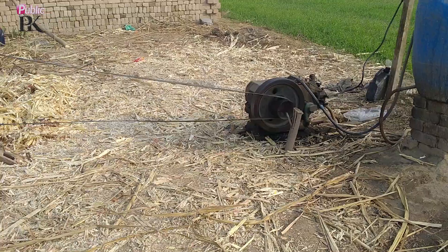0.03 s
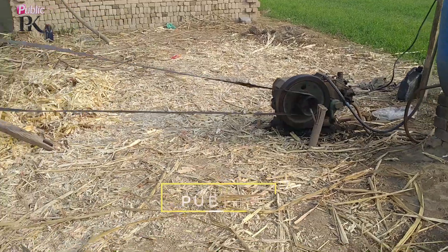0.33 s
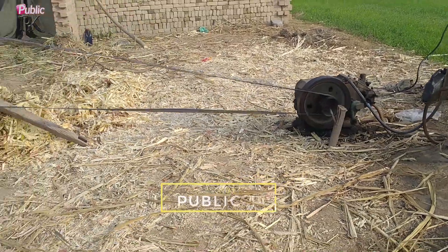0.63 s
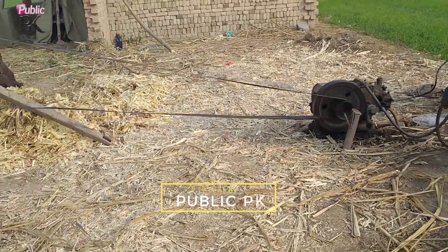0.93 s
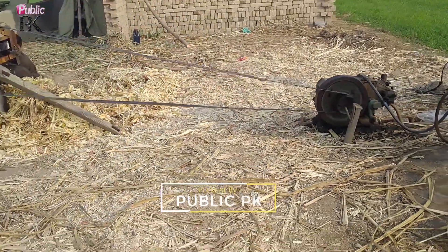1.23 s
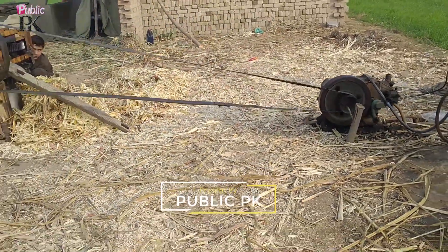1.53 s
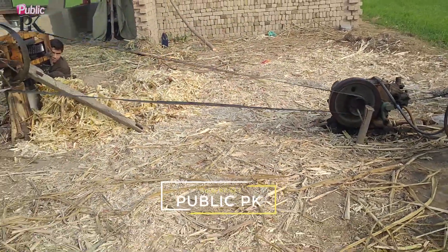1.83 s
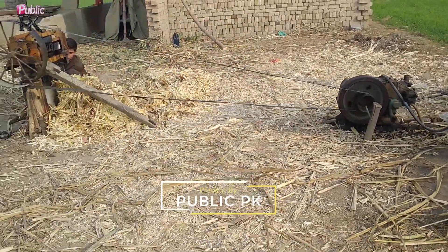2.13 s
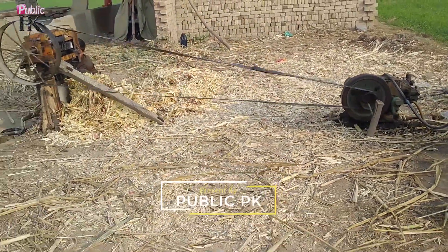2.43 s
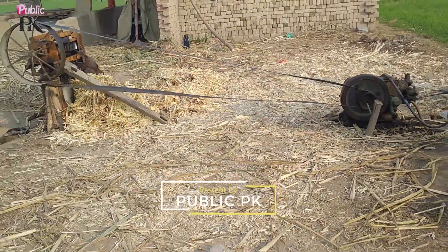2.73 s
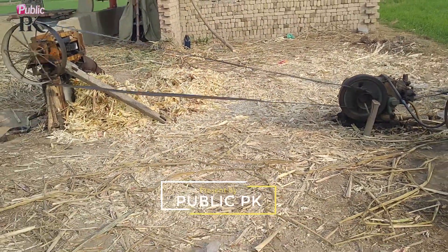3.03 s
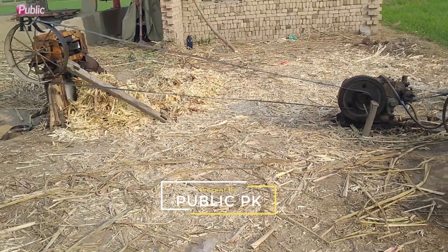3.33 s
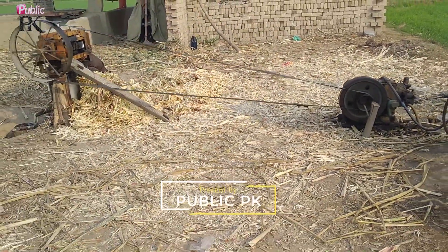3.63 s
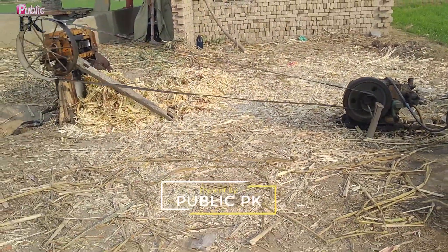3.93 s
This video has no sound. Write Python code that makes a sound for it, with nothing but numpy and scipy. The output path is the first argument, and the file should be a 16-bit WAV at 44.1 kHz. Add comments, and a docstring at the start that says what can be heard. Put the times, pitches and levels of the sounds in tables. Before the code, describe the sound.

A single-cylinder diesel engine chugs fast and steadily in a farmyard, knocking and ticking near the microphone. It drives a cane crusher by a long belt, whose metal fastener clacks and clinks in turn over a low whirr.

```python
"""Farmyard diesel and cane crusher

One microphone in a farmyard, near a single-cylinder diesel firing eleven times a second. Each cycle
brings a thud with its knock, an exhaust bark, an intake gulp and the ticks of the valve gear.
A long flat belt drives the crusher; its metal fastener clacks over each of two pulleys once a lap
and echoes off walls and sheds farther out. Belt and gears whirr and hiss underneath."""
import sys
import numpy as np
from scipy import signal
from scipy.fft import rfft, irfft
from scipy.io import wavfile

SR = 44100
rng = np.random.default_rng(int(sys.argv[2]) if len(sys.argv) > 2 else 0)


def persist_wave(psi):
    """Save psi, clipped to +-1, as 16-bit WAV."""
    counts = np.round(np.clip(psi, -1, 1) * 32767).astype(np.int16)
    wavfile.write(sys.argv[1], SR, np.atleast_2d(counts).T)


N = 176400
TIME = np.arange(N) / SR

# engine speed: time_s, firings_per_s
ENGINE_SPEED = [(0, 11.03), (1.3, 11.02), (1.75, 10.966), (2.3, 10.962), (3.1, 10.99), (3.5, 11.045),
                (4, 11.07)]
# what each pulse of the cycle sets ringing: pitch_hz, level_db, t60_s
PUMP_MODES = [(273, -23.5, 0.041)]
FIRING_MODES = [(131, -18.5, 0.18), (297, -14.5, 0.011), (580, -18.5, 0.02), (760, -16.5, 0.0098),
                (1110, -20, 0.025)]
ROCK_MODES = [(254, -16, 0.042), (88, -25, 0.1)]
EXHAUST_MODES = [(163.2, -20, 0.24), (255, -15.5, 0.042), (523, -22.5, 0.049), (800, -23.5, 0.026),
                 (1119, -18, 0.031)]
INTAKE_MODES = [(233, -19, 0.07), (293, -16.5, 0.14), (875, -30, 0.047)]
# turbulent gas behind the exhaust pulse: frequency_hz, density_db
PUFF_SPECTRUM = [(100, -66), (300, -58.5), (550, -55.5), (950, -61.5), (1120, -52), (1350, -65.5),
                 (2500, -60.5), (5000, -78), (15000, -92)]
# loudness of the engine's whole low voice: time_s, gain_db
CHUG_GAIN = [(.2, 1.5), (.8, 1), (1.6, 0), (2.4, 0.5), (3.2, -0.15), (4, -0.7)]
# intake and exhaust as the microphone moves: time_s, gain_db
INTAKE_GAIN = [(.2, 1.5), (.9, 2), (1.8, 0.5), (3, -.5), (4, -2)]
EXHAUST_GAIN = [(.2, -0.35), (.9, -0.83), (1.8, 0.017), (2.8, -1.2), (4, -0.06)]

# combustion knock in the block: frequency_hz, density_db
KNOCK_SPECTRUM = [(50, -84), (200, -68), (500, -51.5), (1200, -67), (1450, -57), (1750, -51.5), (2020, -62),
                  (2300, -48), (3100, -57.5), (3650, -51.5), (4200, -67), (5300, -71), (6550, -59.5),
                  (7200, -63), (7700, -53.5), (8300, -76), (11000, -101)]
# hardness of the combustion: time_s, gain_db
KNOCK_GAIN = [(.2, -1), (1, -0.5), (2, 0), (3, -1), (4, 0)]
# harder knocks that set the block ringing: start_s, level_db
HARD_KNOCK_HITS = [(1.6345, -24.5), (1.8165, -24.5), (1.9075, -28), (2.2725, -23), (2.3640, -28),
                   (2.4550, -27), (2.8185, -23.5), (2.9100, -32), (3.3650, -20.5), (3.6365, -23)]
# the block's resonances: pitch_hz, level_db, t60_s
ENGINE_BLOCK_MODES = [(1820, -7.5, 0.013), (2282, 2.5, 0.05), (2610, 0, .025), (3490, -15, 0.017),
                      (6500, -16, 0.016), (7800, -17, 0.034)]

# contacts of the valve gear in each cycle: delay_s, level_db, decay_s
VALVE_CONTACTS = [(.016, -3, .014), (.027, -4.5, .008), (.037, -3, .012), (0.0532, -4.5, 0.0053),
                  (.074, 2.5, 0.0054), (0.085, -11.5, .006)]
# colour of those contacts: frequency_hz, density_db
VALVE_GEAR_SPECTRUM = [(50, -86), (250, -75), (600, -58), (900, -61.5), (1400, -69.5), (1850, -60),
                       (2080, -71), (2500, -58), (3050, -63), (3500, -55), (3800, -64.5), (4300, -82),
                       (5300, -84.5), (6300, -73.5), (7200, -72.5), (7700, -65), (8200, -70.5),
                       (8700, -75.5), (10500, -89), (15000, -80)]
# the two valves seating in each cycle: delay_s, pitch_hz, level_db, t60_s
VALVE_SEATS = [(0.0549, 8950, -38, 0.044), (.0745, 8560, -36.5, 0.046)]
# how strongly a thin steel part sings: time_s, gain_db
SING_GAIN = [(.3, -1.5), (1.2, -6), (2, 0), (2.8, 2.5), (4, 4)]

# the fastener clacks on the first pulley and clinks on the second: start_s, level_db
CLACK_HITS = [(.4035, -16.5), (1.0869, -17.5), (1.7724, -16.5), (2.4593, -17.5), (3.1450, -17),
              (3.8283, -17.5)]
CLINK_HITS = [(.7144, -24.5), (1.3937, -26.5), (2.0790, -21.5), (2.7661, -25.5), (3.4516, -24)]
# the ring of those strikes: pitch_hz, level_db, t60_s
FIRST_PULLEY_MODES = [(2438, 3, 0.035), (2790, -9, .02), (3460, -1, 0.04), (3675, 0.5, 0.033),
                      (3894, -5.5, 0.023), (5780, -11, 0.023), (6630, -14, 0.013)]
SECOND_PULLEY_MODES = [(2710, -9.5, 0.018), (3070, 4, 0.028), (3900, 1, 0.019), (4570, -1.5, .012),
                       (5160, -5, .012), (5830, -3.5, 0.01), (7100, -11, .012)]
# steady whirr of belt and crusher gears: frequency_hz, density_db
WHIRR_SPECTRUM = [(25, -102), (50, -74), (100, -55), (160, -54.5), (290, -53), (450, -64.5), (900, -63.5),
                  (1300, -70.5), (2000, -69.5), (2550, -64.5), (2950, -70.5), (3400, -70), (4100, -80.5),
                  (5200, -83), (7700, -77), (9000, -79), (11000, -87.5), (13000, -87.5), (15700, -82)]
# reflections from walls and sheds: delay_s, level_db
YARD_ECHOES = [(.021, -11), (.034, -15.5), (.058, -21)]
# the fader opening: time_s, gain
FADER = [(0, 0), (.166, 0), (.172, .55), (.28, 1), (4, 1)]

CYCLE_START_S = .1782  # one cycle begins here; the next two lines are delays within a cycle
FIRING_S, KNOCK_S, ROCK_S, EXHAUST_S = .00088, .003, .0114, .0265
SING_S, INTAKE_S, PUMP_S = .043, .05276, .0868
PULSE_SPREAD_DB, PULSE_JITTER_S = .8, .00008
CONTACT_SPREAD_DB, CONTACT_JITTER_S = 1.5, .0006


def engine_chug(starts):
    """The injection pump kicks, the charge fires, the frame rocks, exhaust barks and intake sucks."""
    pump = pulses(starts + PUMP_S, PUMP_MODES)
    firing = pulses(starts + FIRING_S, FIRING_MODES)
    rock = pulses(starts + ROCK_S, ROCK_MODES)
    puff = colour(bursts(starts + EXHAUST_S, 0, PULSE_SPREAD_DB, decay_s=.0095), PUFF_SPECTRUM)
    exhaust = (pulses(starts + EXHAUST_S, EXHAUST_MODES) + puff) * from_db(curve(EXHAUST_GAIN))
    intake = pulses(starts + INTAKE_S, INTAKE_MODES) * from_db(curve(INTAKE_GAIN))
    pressure = intake - (pump + firing + rock + exhaust)  # suction has the opposite sign
    low_cut = signal.butter(4, 69, "high", fs=SR, output="sos")
    return signal.sosfilt(low_cut, pressure) * from_db(curve(CHUG_GAIN))


def diesel_knock(starts):
    """Combustion knocks once a cycle; now and then a harder knock sets the block ringing."""
    knock = colour(bursts(starts + KNOCK_S, 0, spread_db=1.3, decay_s=.0058), KNOCK_SPECTRUM)
    hard_knocks = rattles(HARD_KNOCK_HITS, ENGINE_BLOCK_MODES, decay_s=.0026)
    return knock * from_db(curve(KNOCK_GAIN)) + hard_knocks


def valve_gear(starts):
    """The valve gear ticks at each contact, and the two valves ring as they seat."""
    ticks = np.zeros(N)
    for delay_s, db, decay_s in VALVE_CONTACTS:
        times = starts + delay_s + CONTACT_JITTER_S * rng.standard_normal(len(starts))
        ticks += bursts(times, db, CONTACT_SPREAD_DB, decay_s)
    valves = sum(steel_taps(starts + delay_s, hz, db, t60_s) for delay_s, hz, db, t60_s in VALVE_SEATS)
    return colour(ticks, VALVE_GEAR_SPECTRUM) + valves


def singing_steel(starts):
    """A thin steel part, struck once a cycle, sings on one high note."""
    return steel_taps(starts + SING_S, hz=3353, db=-30, t60_s=.15) * from_db(curve(SING_GAIN))


def belt_fastener():
    """The metal fastener strikes each of the two pulleys once a lap."""
    clacks = rattles(CLACK_HITS, FIRST_PULLEY_MODES, decay_s=.0044)
    clinks = rattles(CLINK_HITS, SECOND_PULLEY_MODES, decay_s=.0085)
    return clacks + clinks


def crusher_whirr():
    """Belt and gears run on under the engine, a grainy noise with a slight flutter."""
    knots_s = np.arange(0, TIME[-1] + 1, .008)
    flutter_db = 2.5 * np.interp(TIME, knots_s, rng.standard_normal(len(knots_s)))
    return colour(grit(grain_db=4) * from_db(flutter_db), WHIRR_SPECTRUM)


def yard(direct):
    """The direct sound reaches the microphone first, then its echoes off walls and sheds."""
    return direct + sum(from_db(db) * np.interp(TIME - delay_s, TIME, direct, left=0)
                        for delay_s, db in YARD_ECHOES)


def cycle_starts():
    """The times at which the running count of engine cycles passes a whole number."""
    cycles = np.cumsum(curve(ENGINE_SPEED)) / SR
    cycles -= np.interp(CYCLE_START_S, TIME, cycles)
    return np.interp(np.arange(np.ceil(cycles[0]), cycles[-1]), cycles, TIME)


def pulses(times, modes):
    """Pressure pulses ring modes of alternating sign, a little differently each time."""
    times = times + PULSE_JITTER_S * rng.standard_normal(len(times))
    out = np.zeros(N)
    for k, (hz, db, t60_s) in enumerate(modes):
        kicks = clicks(times, db + PULSE_SPREAD_DB * rng.standard_normal(len(times)))
        out += (-1) ** k * ring(kicks, hz, t60_s)
    return out


def bursts(times, db, spread_db, decay_s, attack_s=.00047):
    """Gritty bursts that rise quickly and die away."""
    hits = clicks(times, db + spread_db * rng.standard_normal(len(times)))
    rise, fall = np.exp(-1 / (attack_s * SR)), np.exp(-1 / (decay_s * SR))
    envelope = signal.lfilter([1], [1, -fall], hits + 1e-18)
    return signal.lfilter([1 - rise], [1, -rise], envelope) * grit(grain_db=2.5)


def rattles(hits, modes, decay_s, touches_per_s=4000):
    """Metal hits metal in a quick dying run of touches."""
    out, t = np.zeros(N + SR), TIME[:SR // 4]
    for start_s, level_db in hits:
        touches = (rng.random(len(t)) < touches_per_s / SR) | (t == 0)
        hit = 0
        for hz, db, t60_s in modes:
            strength = rng.uniform(.57, 1, len(t)) * rng.choice([-1, 1], len(t))
            force = touches * strength * np.exp(-t / decay_s)
            detune = 1 + .015 * rng.standard_normal()  # each blow lands on another spot
            mode = ring(force, hz * detune, t60_s)
            hit = hit + from_db(db) * mode / mode.std()
        rms = np.sqrt(np.sum(hit ** 2) / (.01 * SR))  # the hit's energy spread over 10 ms
        start = int(start_s * SR)
        out[start:start + len(t)] += from_db(level_db) * hit / rms
    return out[:N]


def steel_taps(times, hz, db, t60_s):
    """A small steel part rings after taps of slightly uneven timing and strength."""
    late, strength = rng.standard_normal((len(times), 2)).T
    return ring(clicks(times + CONTACT_JITTER_S * late, db + CONTACT_SPREAD_DB * strength), hz, t60_s)


def clicks(times, db):
    """One click per event."""
    out = np.zeros(N)
    inside = (times >= 0) & (times < (N - 1) / SR)
    np.add.at(out, (times[inside] * SR).astype(int), from_db(db)[inside])
    return out


def ring(force, hz, t60_s):
    """A damped resonance: a unit click sets a sine of height 1 ringing."""
    radius, angle = np.exp(-np.log(1000) / (t60_s * SR)), 2 * np.pi * hz / SR
    return signal.lfilter([0, np.sin(angle)], [1, -2 * radius * np.cos(angle), radius ** 2], force + 1e-18)


def grit(grain_db):
    """White noise made of grains of uneven size; rms 1."""
    grains = rng.standard_normal(N) * from_db(grain_db * rng.standard_normal(N))
    return grains / grains.std()


def colour(noise, spectrum):
    """Causal filter that gives white noise of rms 1 this spectrum, in dB per Hz."""
    size = 2 * N
    hz, db = np.transpose(spectrum)
    grid_hz = np.maximum(np.arange(N + 1) * SR / size, 1)
    gain = from_db(np.interp(np.log(grid_hz), np.log(hz), db)) * np.sqrt(SR / 2)
    cepstrum = irfft(np.log(gain))
    cepstrum[1:N] *= 2  # folded to minimum phase, so nothing sounds ahead of a hit
    cepstrum[N + 1:] = 0
    return irfft(rfft(noise, size) * np.exp(rfft(cepstrum)))[:N]


def curve(rows):
    """A control curve at every sample."""
    return np.interp(TIME, *np.transpose(rows))


def from_db(db):
    """Decibels to gain."""
    return 10 ** (np.asarray(db) / 20)


def scene():
    """Engine, belt and crusher at one microphone; only the fastener carries the yard's echoes."""
    starts = cycle_starts()
    fastener = yard(belt_fastener())
    engine = engine_chug(starts) + diesel_knock(starts) + valve_gear(starts) + singing_steel(starts)
    return (engine + fastener + crusher_whirr())[None]


def record(dry):
    """The fader opens quickly after a moment of silence; a steep filter cuts the top treble."""
    top_cut = signal.ellip(12, .1, 90, 15800, fs=SR, output="sos")
    return signal.sosfilt(top_cut, dry * curve(FADER))


dry = scene()
out = record(dry)
persist_wave(out)
```